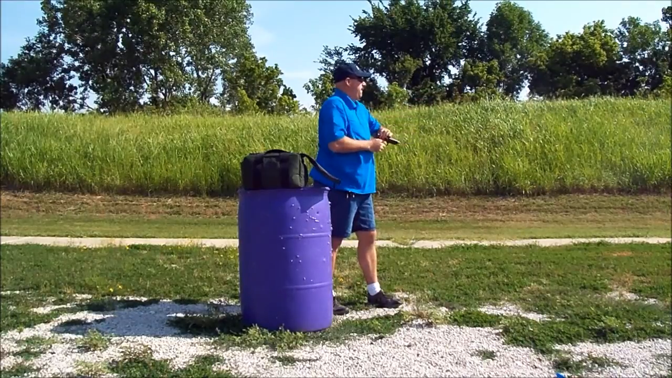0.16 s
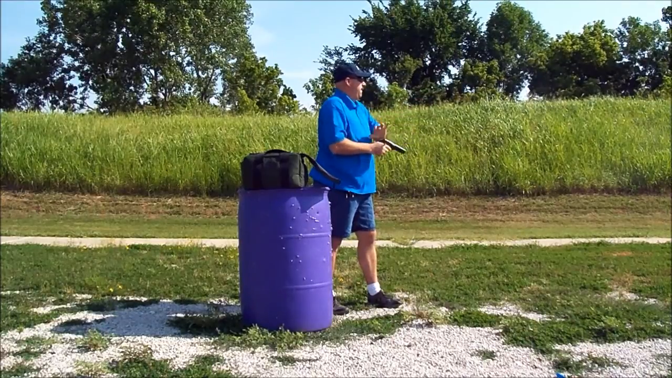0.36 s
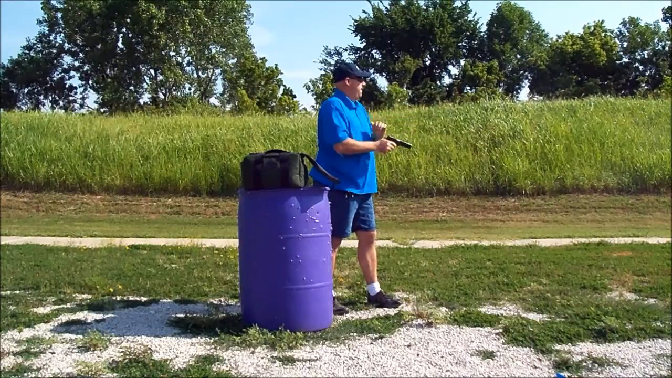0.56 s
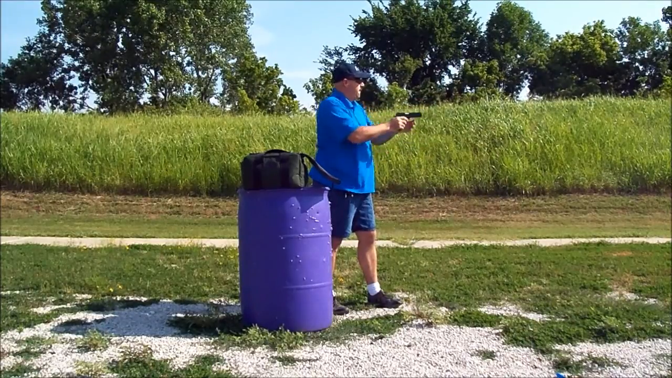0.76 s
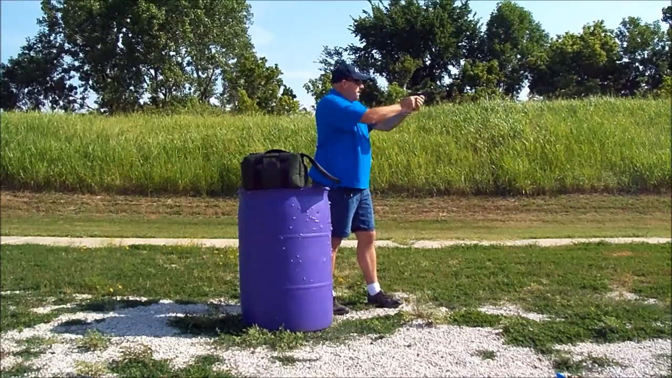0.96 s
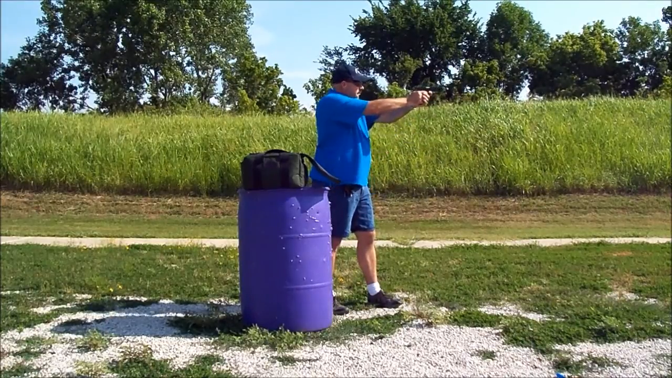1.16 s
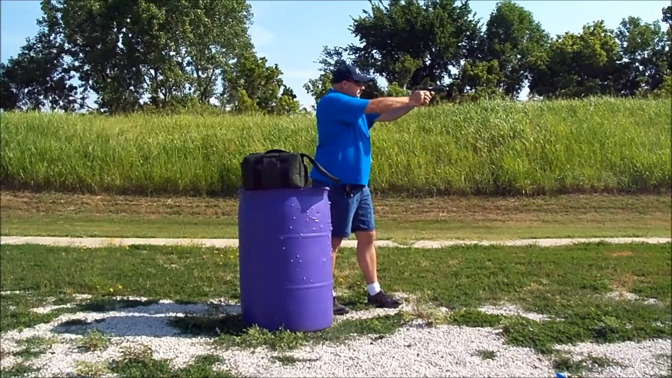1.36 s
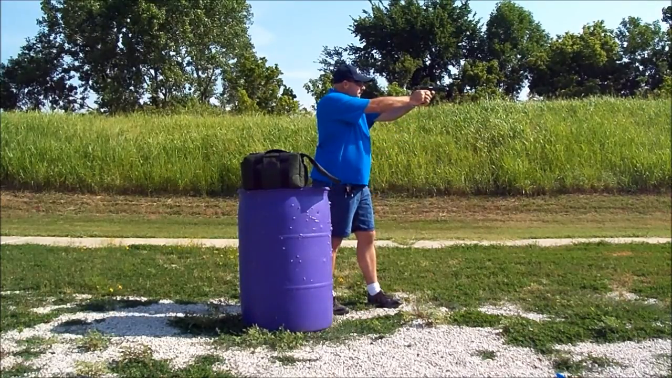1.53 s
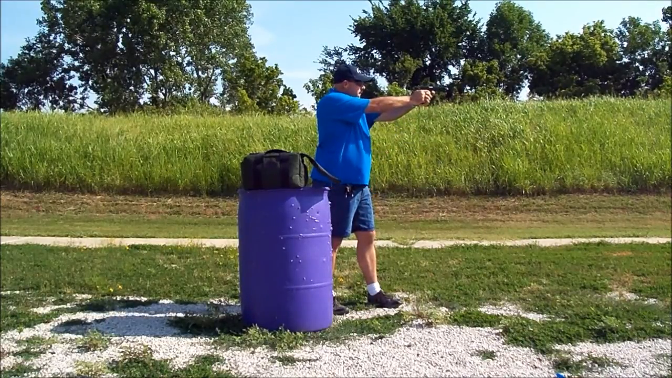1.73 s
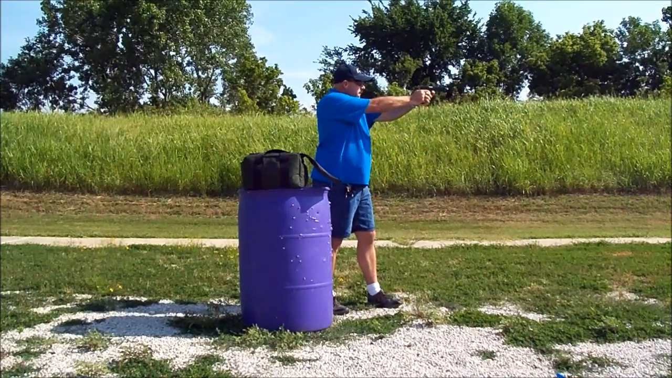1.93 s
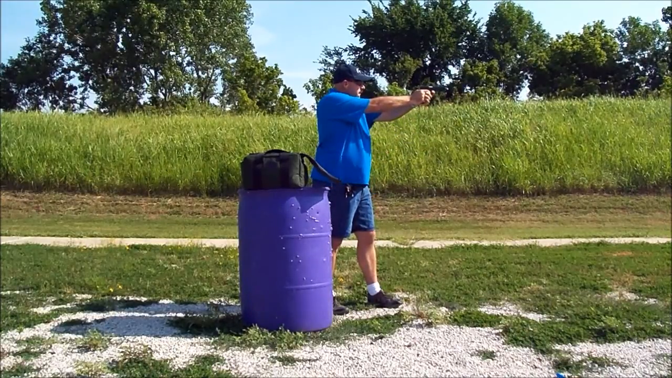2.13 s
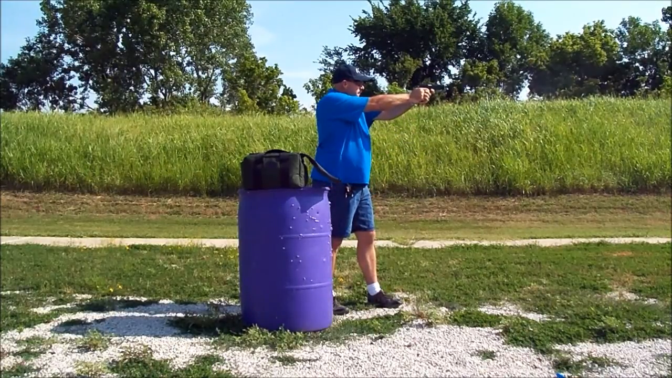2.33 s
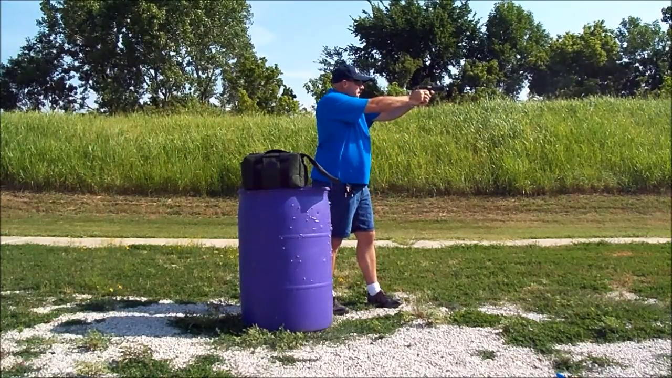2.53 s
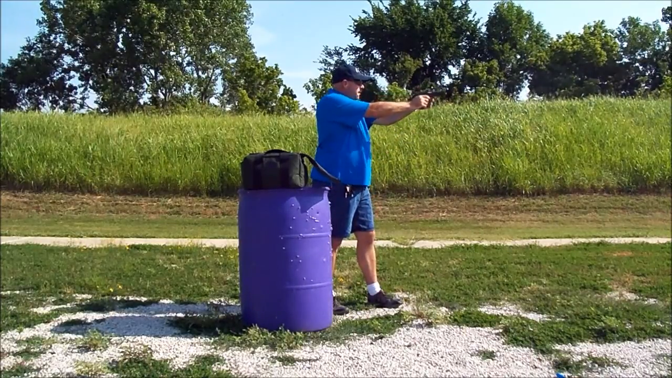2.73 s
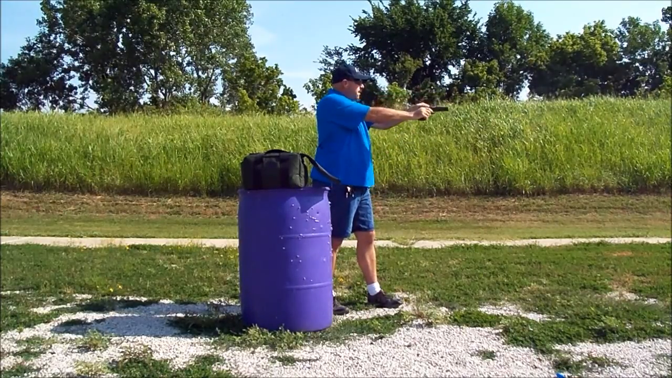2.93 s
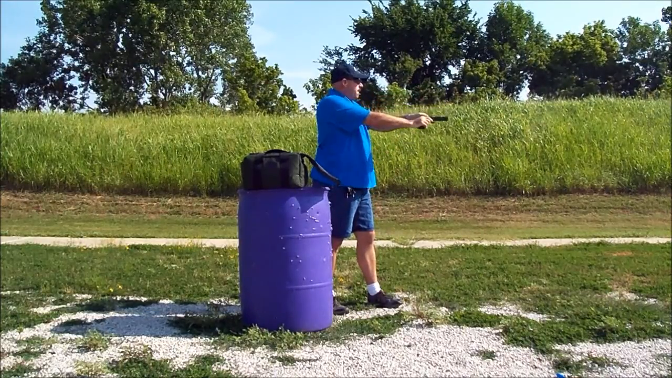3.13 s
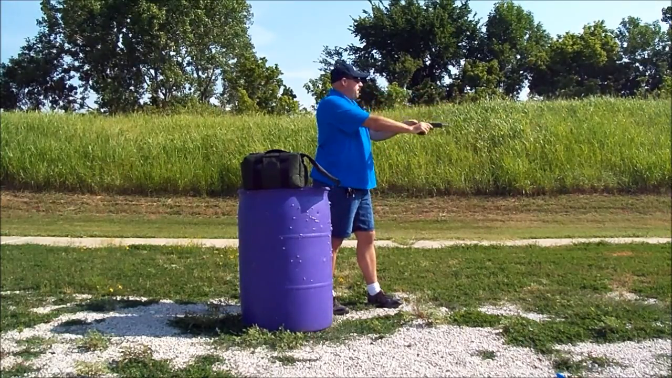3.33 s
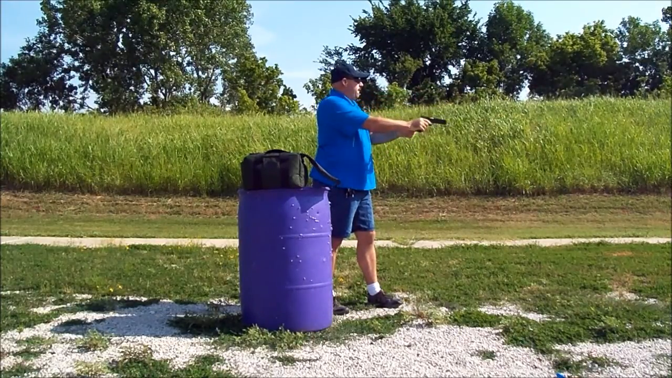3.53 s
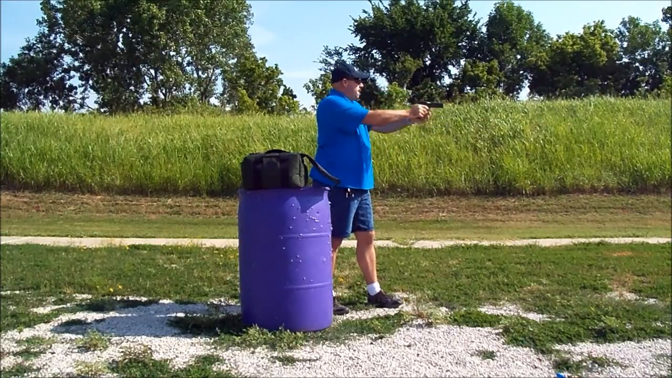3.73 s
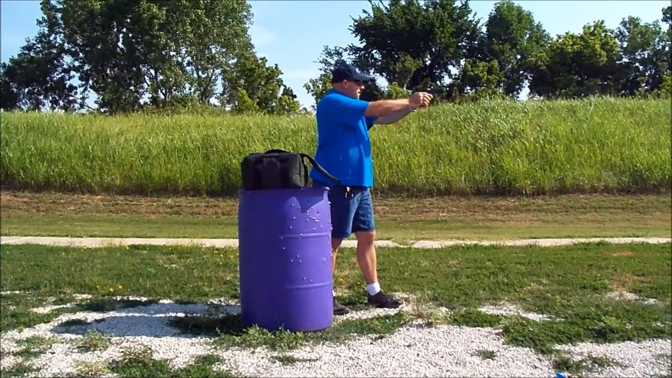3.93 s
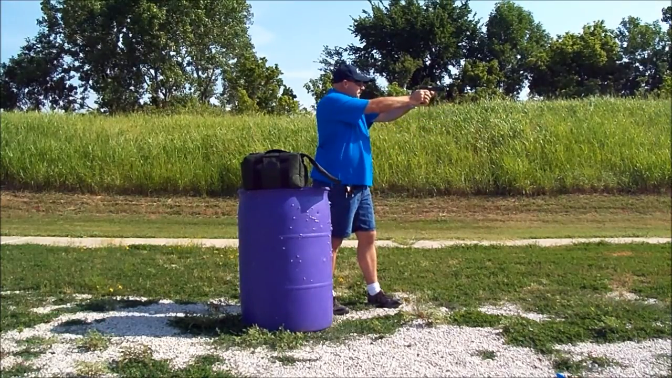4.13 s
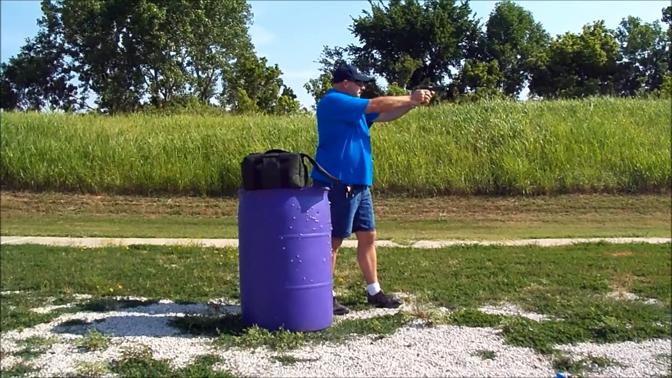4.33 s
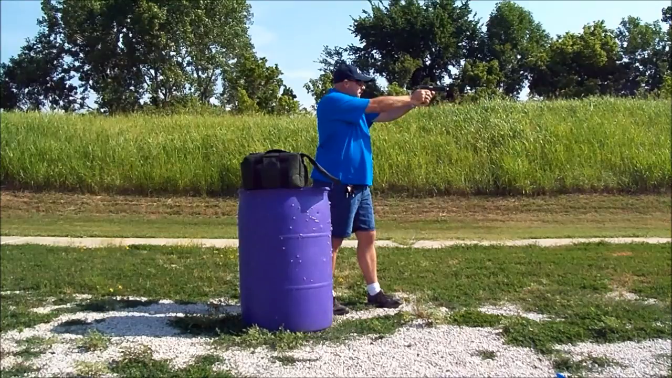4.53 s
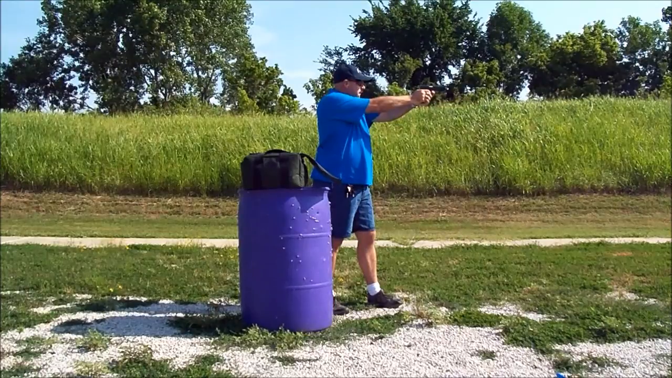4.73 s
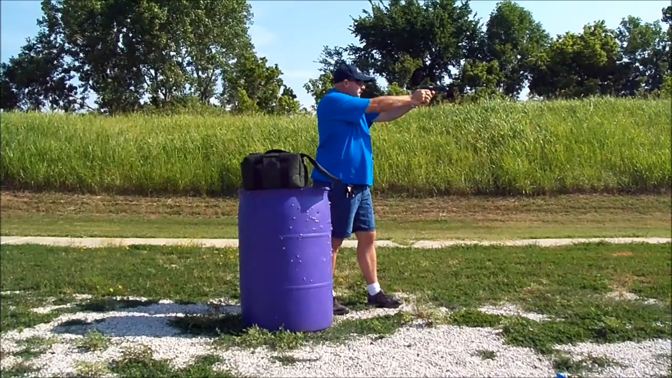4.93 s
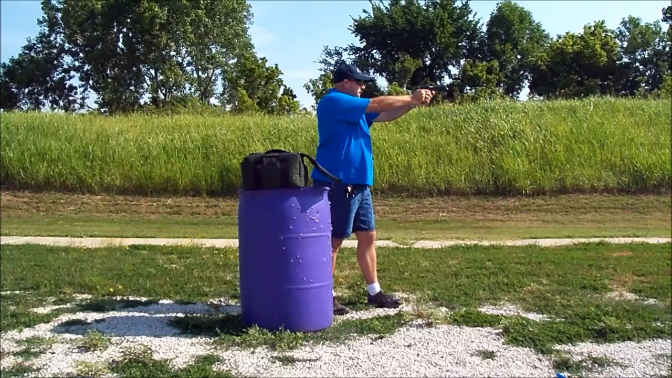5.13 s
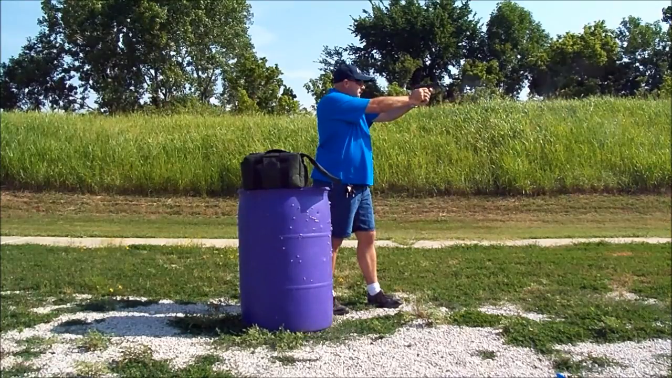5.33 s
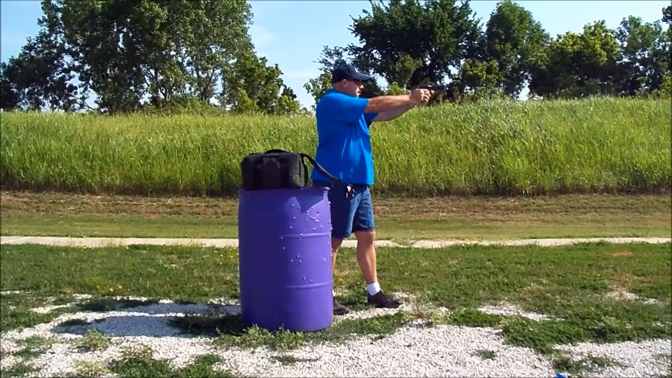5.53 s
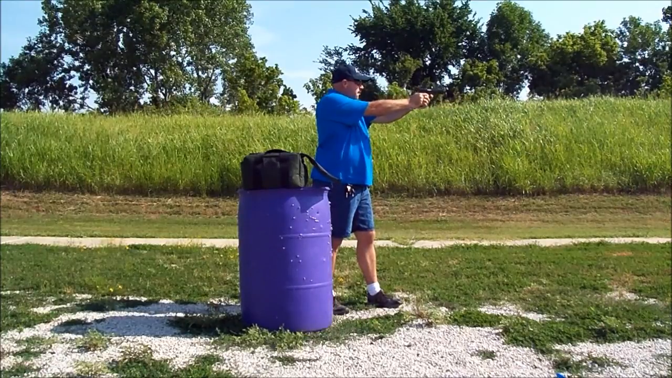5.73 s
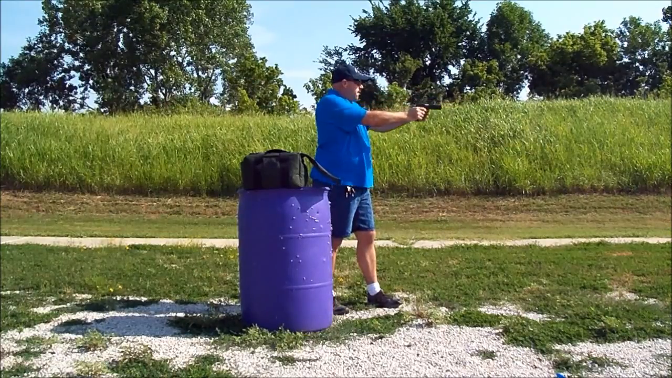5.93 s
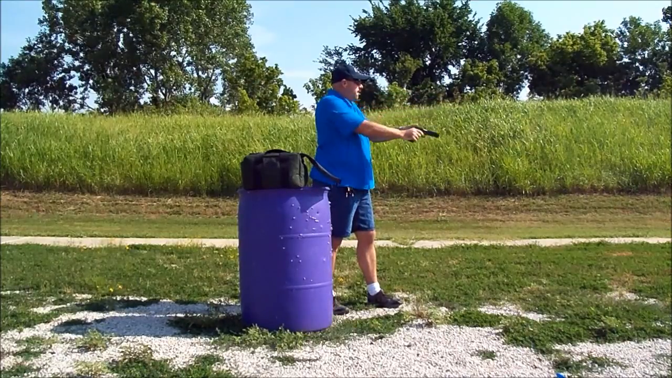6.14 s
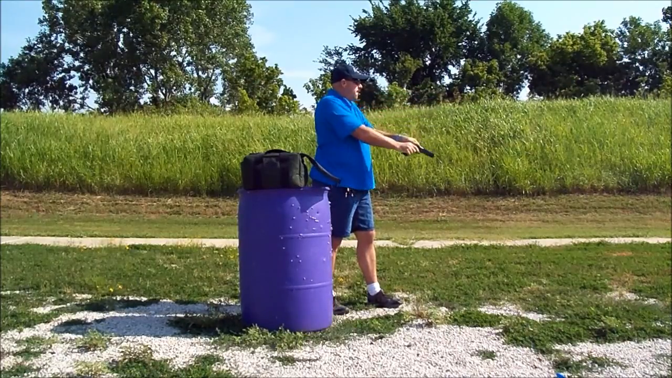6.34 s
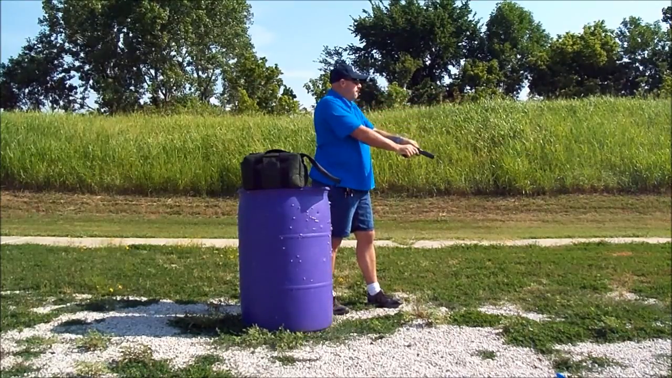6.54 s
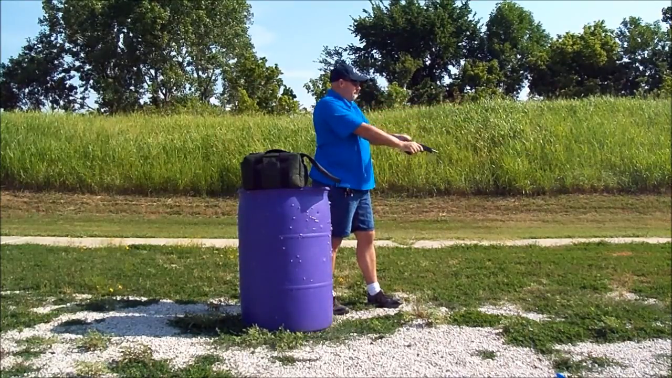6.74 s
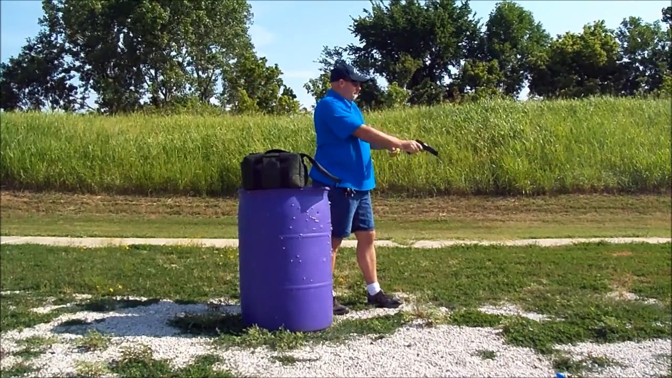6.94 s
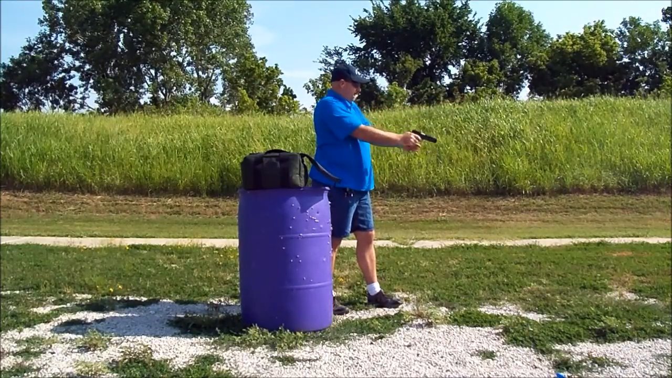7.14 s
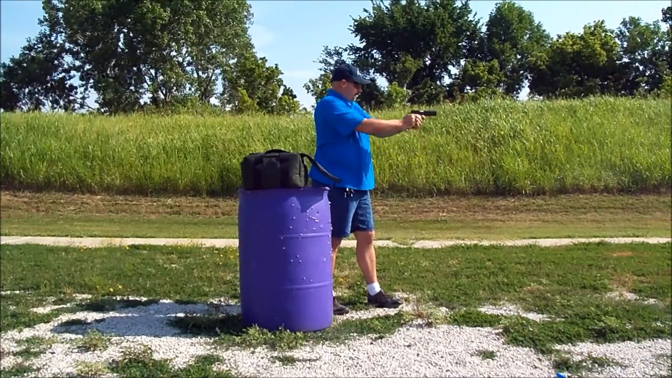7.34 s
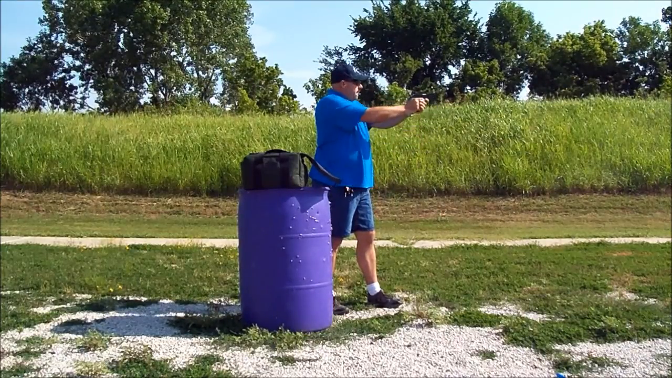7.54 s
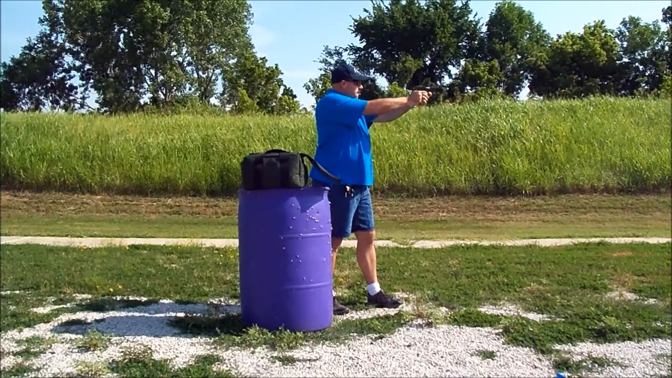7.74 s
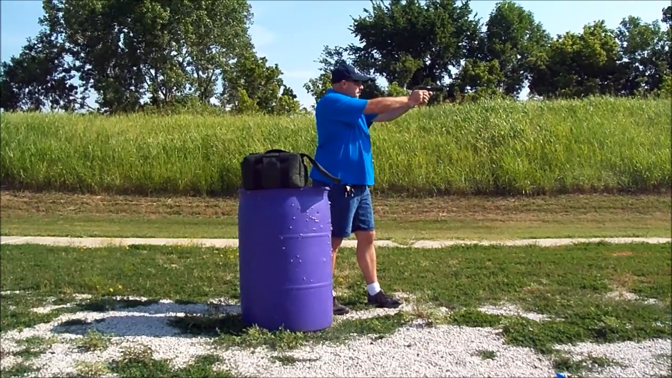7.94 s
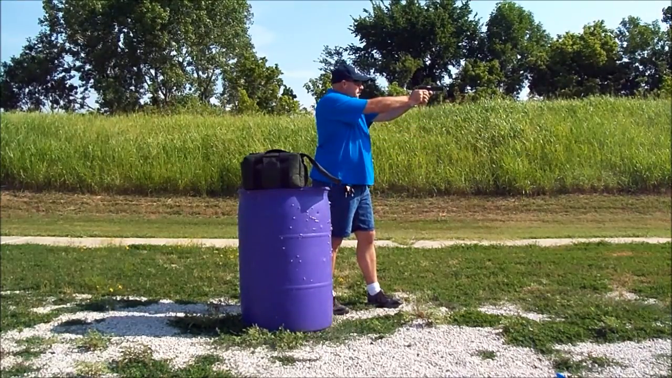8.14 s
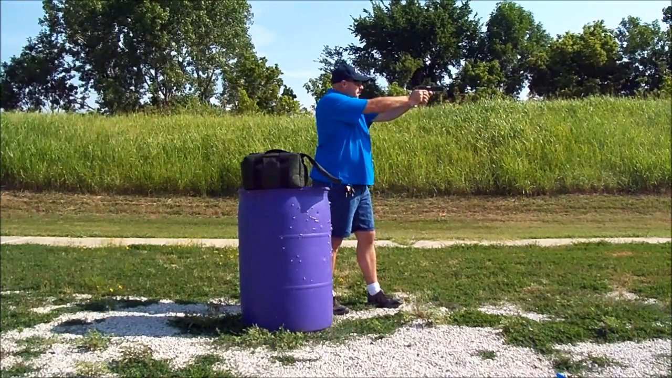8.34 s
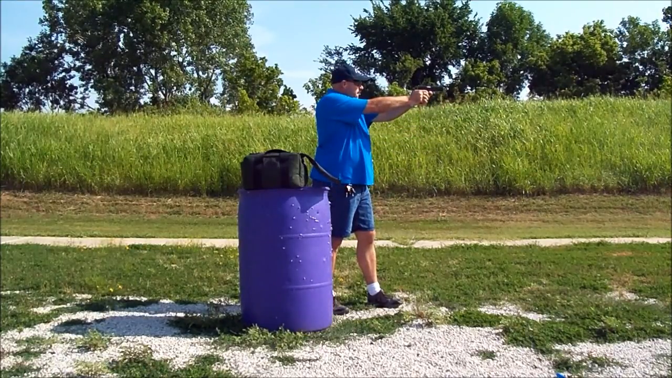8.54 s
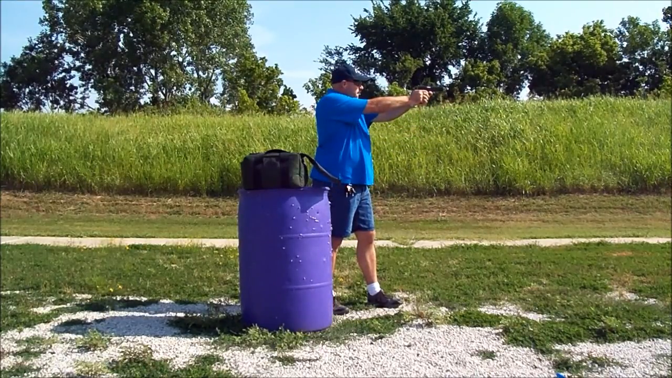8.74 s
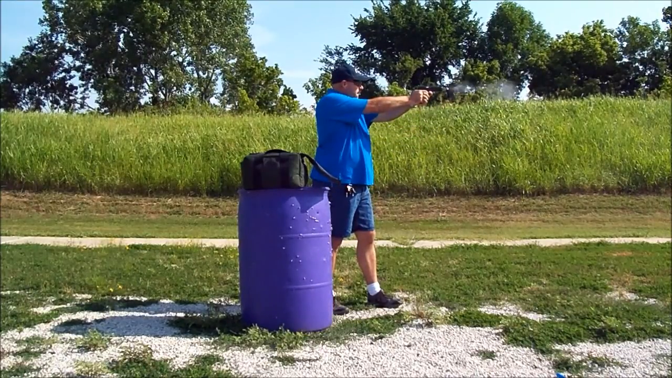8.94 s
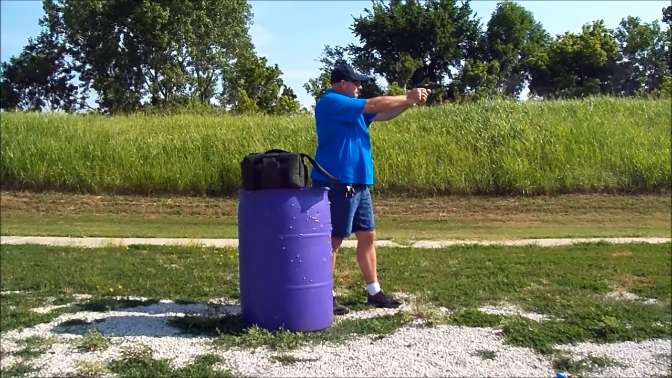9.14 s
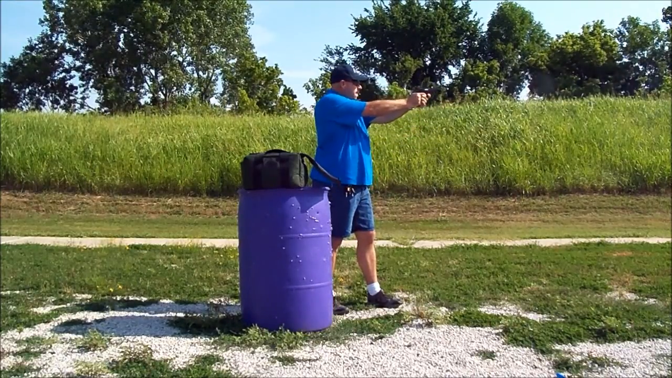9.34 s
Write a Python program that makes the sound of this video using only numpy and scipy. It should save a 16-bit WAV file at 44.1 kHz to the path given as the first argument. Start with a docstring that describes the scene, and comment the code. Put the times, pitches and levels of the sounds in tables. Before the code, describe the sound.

A pistol is fired slowly at a grassy outdoor range. At about 0.2 seconds the slide is pulled back and snaps shut with a sharp steel double clack, followed by a small click. The first shot cracks at 2.2 seconds. The slide is racked again, more softly, around 3.3 seconds, and the second shot comes at 5.3. After light handling taps, another racking at 6.7 to 6.8 seconds leads to the third and loudest shot at 9 seconds. Every blast overloads the microphone and echoes briefly from the ground, an earth bank and trees. Faint hiss and insects continue throughout, and a quiet songbird whistles short phrases, clearest around 6.5 to 7.5 seconds. Light wind rumbles on the microphone, mostly from 6 to 8 seconds. A faint, far engine drones at the start and fades after about 3 seconds.

```python
"""A grassy outdoor range: three slow pistol shots, the slide worked by hand with steel clicks before each.
Every blast overloads the microphone and comes back from the ground, the earth bank and the tree line.
In the pauses a songbird whistles over outdoor hiss and insects; light wind buffets the microphone.
A far engine drones at the start and fades away."""
import sys
import numpy as np
from scipy import signal
from scipy.fft import rfft, irfft
from scipy.io import wavfile
from scipy.ndimage import uniform_filter1d

SR = 44100
rng = np.random.default_rng(int(sys.argv[2]) if len(sys.argv) > 2 else 0)


def persist_wave(psi):
    """Save psi, clipped to +-1, as 16-bit WAV."""
    counts = np.round(np.clip(psi, -1, 1) * 32767).astype(np.int16)
    wavfile.write(sys.argv[1], SR, np.atleast_2d(counts).T)


N = 418068
TIME = np.arange(N) / SR


# Each row: start in seconds, gain in dB.
SHOTS = [(2.2302, -1), (5.337, 1.5), (8.9738, 3)]

def shots(echoes, change=.7):
    """Each blast meets the same landscape, changed by wind and stance."""
    t, out = np.arange(len(echoes)) / SR, np.zeros(N)
    for start, db in SHOTS:
        scatter = (echoes + change * landscape()) / np.hypot(1, change)
        add(out, start, amp(db) * (scatter + pressure_swing(t) + slat_echo(t)))
    return out


def pressure_swing(t, start_s=.003, suction_s=.008, suction_db=3, rebound_s=.006, rebound_db=-7):
    """After the crack the pressure falls far below rest, then swings back slowly."""
    dip = np.sin(np.pi * np.clip((t - start_s) / suction_s, 0, 1))
    recovery = np.maximum(t - start_s - suction_s, 0) / rebound_s
    return amp(rebound_db) * recovery * np.exp(1 - recovery) - amp(suction_db) * dip


def slat_echo(t, delay_s=.0685, end_hz=2800, sweep=1.6, settle_s=.0014, t60=.051, db=-6, rough=.2):
    """A row of slats returns a short, rough whistle that falls to a steady pitch."""
    age = np.maximum(t - delay_s, 0)
    hz = end_hz * (1 + sweep * np.exp(-age / settle_s))
    hz *= 1 + rough * wander(len(t), window=16)
    return decay(age, db, t60) * (age > 0) * tone(hz)


def landscape(air_loss_db_per_hz_s=.0055, patchy_db=1.42):
    """A bang and its scattered returns, duller the farther they have travelled."""
    t = np.arange(2 * SR) / SR
    out = near_field(t) + tree_line(t)
    out *= amp(patchy_db * wander(len(t), window=500))  # single trunks and crowns
    hz, age, spectrogram = signal.stft(out, SR, nperseg=256)
    spectrogram *= amp(-air_loss_db_per_hz_s * hz[:, None] * age)
    return signal.istft(spectrogram, SR, nperseg=256)[1][:len(t)]


# Returns from hard surfaces nearby. Each row: delay in seconds, relative level in dB, peak in Hz.
SLAPS = [(.027, 0, 850), (.038, -0.5, 1055), (0.0634, -3, 802), (.084, -10.5, 240), (.107, -7.5, 760),
         (.113, -10.5, 190)]
# Earth bank's return. Each row: frequency in Hz, relative level in dB.
BANK_COLOUR = [(60, -27.5), (300, -8.5), (750, -6), (2000, -10.5), (4500, -7), (14000, -9)]

def near_field(t, ground_s=.0105, bank_s=.074):
    """The muzzle blast, then the ground's scatter, thump and rumble, the slaps and the earth bank."""
    out = cloud(t, hump(hz=403, slope_db=-4), db=2, rise_s=.0023, t60=.045)
    add(out, ground_s, cloud(t, hump(hz=560, slope_db=-2.5), db=-2.5, rise_s=.002, t60=.2))
    add(out, ground_s, cloud(t, hump(hz=293, slope_db=-8), db=-12, rise_s=.022, t60=.11))
    add(out, ground_s, cloud(t, hump(hz=130, slope_db=-7), db=-35, rise_s=.03, t60=.68))
    for delay, db, hz in SLAPS:
        add(out, delay, cloud(t, hump(hz, slope_db=-10), db, rise_s=.002, t60=.055))
    add(out, bank_s, cloud(t, BANK_COLOUR, db=-6.5, rise_s=.022, t60=.29))
    return out


# Rows of trees, nearest first. Each entry: echo delay in seconds.
TREE_DELAYS_S = [.165, .198, .222, .26, .342, .405, .53]
# Trees' return. Each row: frequency in Hz, relative level in dB.
TREE_COLOUR = [(60, -38), (330, -13.5), (620, 0), (1200, 0), (1600, -4.5), (2400, 2), (2900, -2), (3500, 0),
               (5000, -2.5), (7000, -5.5), (14000, -7)]

def tree_line(t, nearest_db=-14, doubling_db=-14, grass_db=-2, grass_hz=1500, ripple_db=3):
    """Each row of trees answers in its own colour: fainter, longer and thinner with distance."""
    out, hz = np.zeros(len(t)), np.geomspace(60, 14000, 48)
    tree_hz, tree_db = np.transpose(TREE_COLOUR)
    shared = np.interp(np.log(hz), np.log(tree_hz), tree_db)
    for delay in TREE_DELAYS_S:
        distance = delay / TREE_DELAYS_S[0]
        doublings, stretch = np.log2(distance), distance ** .45
        ripple = ripple_db * np.clip(rng.standard_normal(len(hz)), -1, 1)
        grass_loss = grass_db * doublings * (hz < grass_hz)
        spectrum = np.transpose([hz, shared + ripple + grass_loss])
        db = nearest_db + doubling_db * doublings
        add(out, delay, cloud(t, spectrum, db, rise_s=.024 * stretch, t60=.31 * stretch))
    return out


def cloud(t, spectrum, db, rise_s, t60):
    """Scattered sound swells and dies away."""
    envelope = np.minimum(t / rise_s, 1) * decay(np.maximum(t - rise_s, 0), db, t60)
    return envelope * noise(spectrum, len(t))


# Slide pulled back. Each row: stop time in seconds, level in dB, time stretch, spring in Hz and dB.
PULLS = [(.2422, -10.5, 1.03, 11800, -48), (3.2752, -17, .96, 11350, -49), (6.717, -14, 1.06, 11480, -39)]
# Slide let go. Each row: slam time in seconds, level in dB, time stretch.
SLAMS = [(.3685, -5.5, 0.97), (3.3995, -11.5, 1.25), (6.809, -6.5, .87)]
# Contacts in a stroke. Each row: unstretched offset in seconds, relative level in dB, t60 in seconds.
PULL_CONTACTS = [(-.048, -17.5, .024), (-.027, -22, 0.033), (-.013, -19.5, .04), (-.009, -13, .025),
                 (0, 0, .02)]
SLAM_CONTACTS = [(-.031, -29, .03), (-.0195, -17, .045), (-.0145, -17.5, .035), (-.010, -13.5, .045),
                 (0, 0, .021), (.004, -5, .029)]
# Steel clicks and the duller pull. Each row: frequency in Hz, relative level in dB.
CLICK_COLOUR = [(100, -37.5), (400, -26.5), (900, -11.5), (2300, -7.5), (4000, -2.5), (7000, -1.5),
                (10000, -3), (14000, -2.5)]
PULL_COLOUR = [(100, -43), (400, -29.5), (900, -10.5), (2300, -1), (4600, 0), (7000, -5), (10000, -4.5),
               (14000, -4)]

def slide(light_db=-9):
    """The slide strikes a run of contacts on its way back, and another as it feeds and slams shut."""
    t, out = np.arange(SR // 4) / SR, np.zeros(N)
    directions = (PULLS, PULL_CONTACTS, PULL_COLOUR), (SLAMS, SLAM_CONTACTS, CLICK_COLOUR)
    for strokes, contacts, full in directions:
        for stop, db, stretch, *_ in strokes:
            for offset, contact_db, t60 in contacts:
                start = stop + (offset * stretch if offset < 0 else offset)
                spectrum = full if contact_db > light_db else thinned(full, low_hz=1500)
                add(out, start, click(t, db + contact_db, t60, spectrum))
    return out


# Small levers. Each row: start in seconds, level in dB, spring in Hz and dB.
LEVERS = [(.872, -30.5, 11860, -38.5), (3.151, -43, 11350, -70), (3.974, -46.5, 11340, -51),
          (4.114, -53, 11340, -49), (7.053, -40, 11440, -44)]
# Rattles after hard slams. Each row: start in seconds, level in dB.
RATTLES = [(.436, -40), (6.876, -37)]
# A soft, dull puff of noise as the sound begins, then handling taps and scuffs.
# Each row: start in seconds, level in dB, peak in Hz, t60 in seconds.
DULL_BURSTS = [(.03, -50, 1300, .14), (3.865, -59, 1100, .15), (6.136, -52, 2000, .04),
               (6.337, -42.5, 2200, .035), (6.975, -54, 1200, .08)]

def small_noises():
    """Levers click thinly and the pistol rattles in the hand, among soft, dull bursts of noise."""
    t, out = np.arange(SR // 4) / SR, np.zeros(N)
    for start, db, *_ in LEVERS:
        add(out, start, click(t, db, t60=.019, spectrum=thinned(CLICK_COLOUR, low_hz=3500)))
    for start, db in RATTLES:
        add(out, start, click(t, db, t60=.035, spectrum=thinned(CLICK_COLOUR, low_hz=2000)))
    for start, db, hz, t60 in DULL_BURSTS:
        add(out, start, click(t, db, t60, spectrum=hump(hz, slope_db=-18)))
    return out


# Modes of slide and frame. Each row: frequency in Hz, relative level in dB, t60 in seconds.
STEEL_MODES = [(2400, -33, .012), (4690, -22, .009), (7120, -26, .015), (7950, -48.5, .12),
               (9000, -25.5, .012), (10300, -26, 0.01)]
# The clicks' echo. Each row: frequency in Hz, gain in dB.
ECHO_COLOUR = [(300, -18), (1500, -10), (4000, -5), (6000, -4), (7200, 0), (8000, -3), (9100, 5.5),
               (11000, -2.5), (14000, 1.5)]

def action(echoes, ring_db=-8, echo_db=-21, spring_t60=.2, barrel_db=-17, frame_db=-13):
    """Steel parts snap together, ring and echo faintly from the range; a small spring sings on."""
    t = np.arange(SR // 4) / SR
    out = slide() + small_noises()
    body = sum(decay(t, db, t60) * np.cos(2 * np.pi * hz * t) for hz, db, t60 in STEEL_MODES)
    out += amp(ring_db) * signal.oaconvolve(out, body / np.linalg.norm(body))[:N]
    echo = signal.oaconvolve(out, echoes / np.linalg.norm(echoes))[:N]
    out += amp(echo_db) * colour(echo, ECHO_COLOUR)
    for stop, db, stretch, *_ in PULLS:
        unlock = stop + PULL_CONTACTS[0][0] * stretch
        add(out, unlock, ping(t, hz=4500, db=db + barrel_db, t60=.025))
        add(out, stop, ping(t, hz=2170, db=db + frame_db, t60=.018))
    for start, *_, hz, db in PULLS + LEVERS:
        add(out, start, spring(t, hz, db, spring_t60))
    return out


def click(t, db, t60, spectrum, rise_s_per_db=3.3e-5):
    """A sharp strike and a short rattle; light touches slide into contact, hard ones hit at once."""
    strike, rattle = decay(t, db=1, t60=.004), decay(t, db=-1.5, t60=t60)
    rise_s = rise_s_per_db * abs(db) + 1 / SR
    return amp(db) * np.minimum(t / rise_s, 1) * (strike + rattle) * noise(spectrum, len(t))


def thinned(spectrum, low_hz, db_per_octave=9):
    """A light contact has little below low_hz."""
    return [(hz, db - db_per_octave * max(np.log2(low_hz / hz), 0)) for hz, db in spectrum]


def ping(t, hz, db, t60):
    """One dying mode."""
    return decay(t, db, t60) * np.sin(2 * np.pi * hz * t)


def spring(t, hz, db, t60, split_hz=45, twin=.45):
    """Two close modes of a coil beat against each other."""
    return ping(t, hz, db, t60) + twin * ping(t, hz + split_hz, db, t60)


# Syllables by phrase. Each row: delay and length in seconds, relative level in dB,
# then first, middle and last base pitch in Hz.
PHRASES = { "falling": [(0, .05, 0, 3050, 2720, 2720), (.07, .045, -0.5, 2800, 2980, 3200),
           (.125, .09, 0, 2620, 2340, 2290)], "skipping": [(0, 0.039, -7, 3300, 2800, 2490),
           (.05, .045, -1, 3100, 3350, 4000), (.115, .06, 0, 2480, 2900, 2350)],
           "arching": [(0, 0.128, -1.5, 2740, 3070, 3110), (.18, .1, -9, 3760, 4150, 3710),
           (.29, .078, -4, 2520, 3140, 2190)], "swooping": [(0, .045, 0, 2580, 2750, 3020),
           (.03, 0.071, -4.5, 3680, 3670, 3730), (.1, 0.14, -13, 3700, 3850, 4000),
           (.235, .045, -9, 4000, 4300, 3900), (.275, .06, -2.5, 3600, 2600, 2350)]}
# Each row: start in seconds, phrase, relative level in dB, pitch factor.
SONG = [(.405, "falling", -59, 0.94), (.825, "falling", -60, 1), (1.185, "skipping", -53.5, 1),
        (3.085, "arching", -59, 1), (4.405, "arching", -61.5, 1.02), (6.395, "arching", -49.5, 1.01),
        (7.19, "arching", -49.5, 0.986), (7.94, "swooping", -58, 0.98), (8.54, "swooping", -55.5, 1)]

def bird(waver=.011, flutter_db=2.5, gain_db=1):
    """Whistled syllables: two glides joined at a bend, quavering in pitch and strength."""
    out = np.zeros(N)
    quaver = 1 + waver * wander(N, window=150)
    flutter = amp(flutter_db * wander(N, window=700))
    for phrase_start, phrase, phrase_db, pitch in SONG:
        for delay, length, db, *bends_hz in PHRASES[phrase]:
            start, size = phrase_start + delay, int(length * SR)
            glides = np.interp(np.linspace(0, 2, size), np.arange(3), bends_hz)
            hz = pitch * uniform_filter1d(glides, size=size // 8) * quaver[int(start * SR):][:size]
            add(out, start, amp(phrase_db + db) * signal.windows.tukey(size, .5) * tone(hz))
    return amp(gain_db) * flutter * out


# Wind rumble. Each row: frequency in Hz, relative level in dB.
WIND_COLOUR = [(8.8, -29), (15, 1), (71, -1.5), (123, -11), (254, -28.5), (400, -33.5), (520, -62.5),
               (880, -120)]
# Each row: peak time in seconds, level in dB, half-length in seconds.
GUSTS = [(1.62, -43, 0.078), (4.768, -38.5, .04), (6.05, -34.5, 0.035), (6.25, -35, 0.042),
         (6.15, -43, 0.33), (6.68, -40, .17), (7.5, -37.5, 0.089), (7.777, -40.5, 0.053),
         (8.78, -43.5, 0.22)]

def wind(calm_db=-52, lumpy_db=3):
    """Lumpy wind on the microphone: bell-shaped gusts over a calm breeze."""
    lumps = amp(lumpy_db * wander(N, window=2400))
    gust_power = sum(amp(db) ** 2 * np.exp(-((TIME - peak) / half) ** 2) for peak, db, half in GUSTS)
    return np.sqrt(amp(calm_db) ** 2 + gust_power) * unit(lumps * noise(WIND_COLOUR, N))


# Open air and a far insect chorus. Each row: frequency in Hz, relative level in dB.
AIR_COLOUR = [(88, -31), (150, -2.5), (178, -7), (333, -12.5), (402, -13.5), (725, -18.5), (797, -16.5),
              (1060, -20.5), (3070, -26), (4080, -26.5), (4570, -24.5), (5630, -31.5), (10900, -36),
              (13200, -34), (14000, -36)]
INSECT_COLOUR = [(3700, -35), (4300, -6), (4650, 0.5), (4950, -7), (5700, -34.5)]
# Each row: start in seconds, gain in dB.
HISS_GAIN_STEPS = [(-.2, -54.5), (4.72, -53.5), (8.7, -51.5)]

def outdoor_hiss(insects_db=-19, rise_s=.13, first_second_sink_db=.66, sink_power=1.55):
    """Outdoor hiss with insects; the recorder's gain steps up quickly, then sinks ever faster."""
    gain = np.zeros(N)
    for start, db in HISS_GAIN_STEPS:
        age = np.maximum(TIME - start, 0)
        step = np.minimum(age / rise_s, 1) * amp(db - first_second_sink_db * age ** sink_power)
        gain = np.maximum(gain, step)
    return gain * (noise(AIR_COLOUR, N) + amp(insects_db) * noise(INSECT_COLOUR, N))


def engine(base_hz=129, waver_hz=3.5, sag_hz=6, settle_s=1.5, db=-53.5, leaves_s=2.65, fade_db_per_s=9):
    """A far engine's wavering drone sags a little in pitch, then fades away."""
    hz = base_hz + sag_hz * np.exp(-TIME / settle_s) + waver_hz * wander(N, window=2500)
    level = amp(db - fade_db_per_s * np.maximum(TIME - leaves_s, 0))
    return level * unit(tone(hz))


def amp(db):
    """Decibels to gain."""
    return 10 ** (np.asarray(db) / 20)


def decay(t, db, t60):
    """Gain that starts at db and falls 60 dB in t60 seconds."""
    return amp(db - 60 * t / t60)


def unit(x):
    """Scales to rms 1."""
    return x / np.sqrt(np.mean(x ** 2) + 1e-20)


def add(mix, start_s, sound):
    """Mixes a sound in at start_s."""
    part = mix[max(round(start_s * SR), 0):][:len(sound)]
    part += sound[:len(part)]


def tone(hz):
    """A sine that follows a pitch curve."""
    return np.sin(2 * np.pi * np.cumsum(hz) / SR)


def wander(size, window):
    """Random drift of rms 1, smoothed over window samples."""
    return unit(uniform_filter1d(rng.standard_normal(size), size=window))


def hump(hz, slope_db):
    """A spectrum peaking at hz: slope_db per octave above, a 12 dB per octave roll-off below."""
    return [(hz / 32, -60), (hz, 0), (hz * 32, 5 * slope_db)]


def colour(x, spectrum):
    """Filters by rows of frequency in Hz and gain in dB."""
    hz, db = np.transpose(spectrum)
    bins_hz = np.fft.rfftfreq(len(x), 1 / SR)
    gain = amp(np.interp(np.log(bins_hz + 1), np.log(hz), db))
    return irfft(rfft(x) * gain, len(x))


def noise(spectrum, size):
    """Noise of rms 1 with the given spectrum."""
    return unit(colour(rng.standard_normal(size), spectrum))


def scene():
    """The pistol, its action and the open air, in mono."""
    echoes = landscape()
    return (shots(echoes) + action(echoes) + bird() + wind() + outdoor_hiss() + engine())[None]


def record(dry, ceiling=.47, sizzle_db=-22, lag=.4, presence=.22, cutoff_hz=14100):
    """The microphone overloads and sizzles; phase lag and treble lift put spikes on the flat tops."""
    clipped = dry / (1 + (dry / ceiling) ** 4) ** .25
    overload = np.tanh(abs(dry - clipped) / ceiling)
    sizzle = amp(sizzle_db) * overload * rng.standard_normal(dry.shape)
    smeared = signal.lfilter([lag, 0, 1], [1, 0, lag], clipped + sizzle)
    bright = signal.lfilter([1 + presence, -presence], [1], smeared)
    lowpass = signal.firwin(255, cutoff_hz, window=("kaiser", 9), fs=SR)
    return signal.oaconvolve(bright, lowpass[None], "same")


dry = scene()
out = record(dry)
persist_wave(out)
```